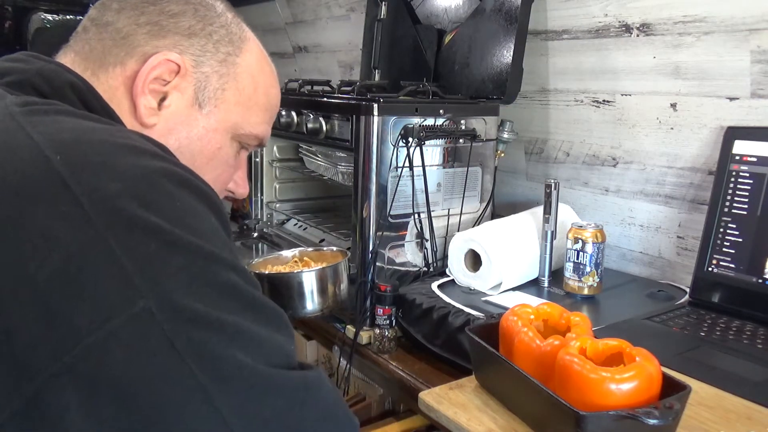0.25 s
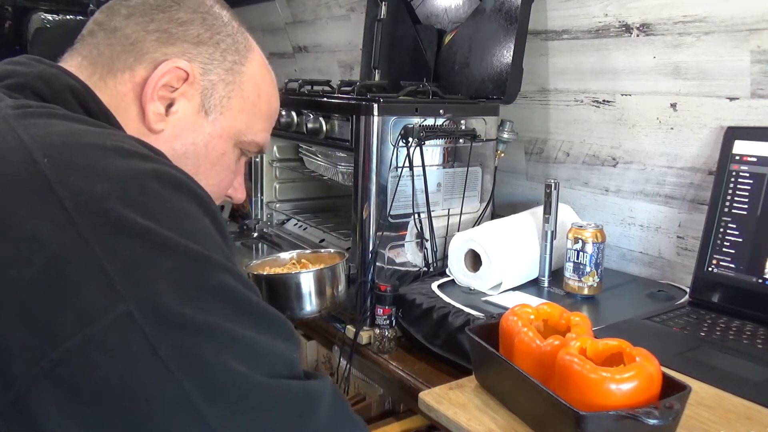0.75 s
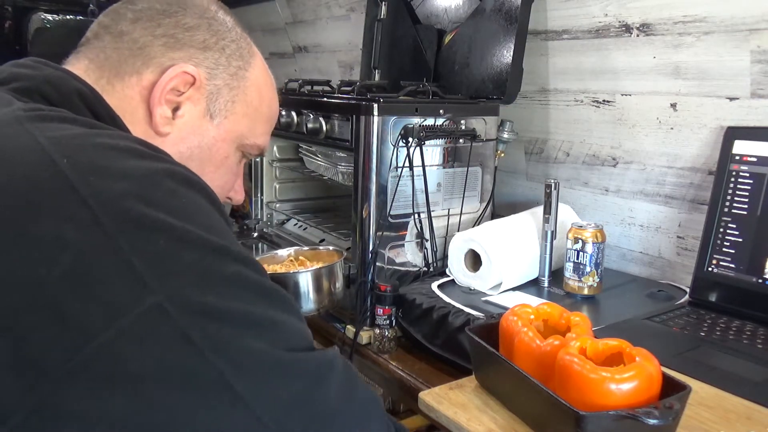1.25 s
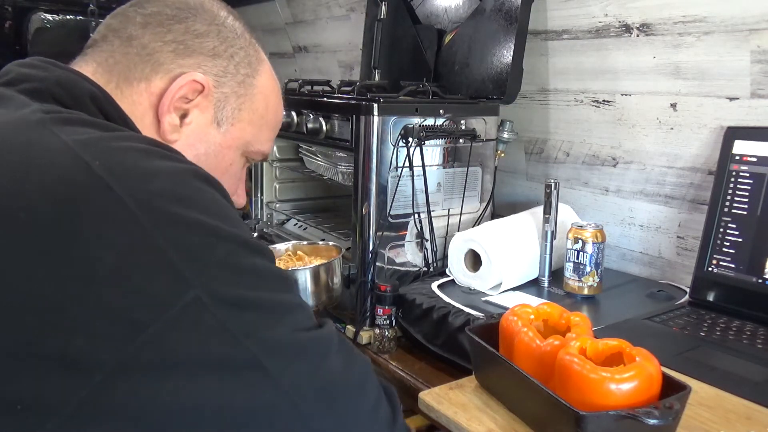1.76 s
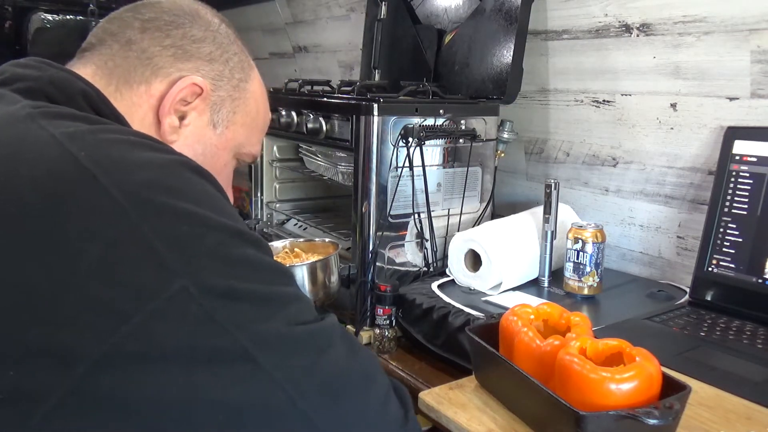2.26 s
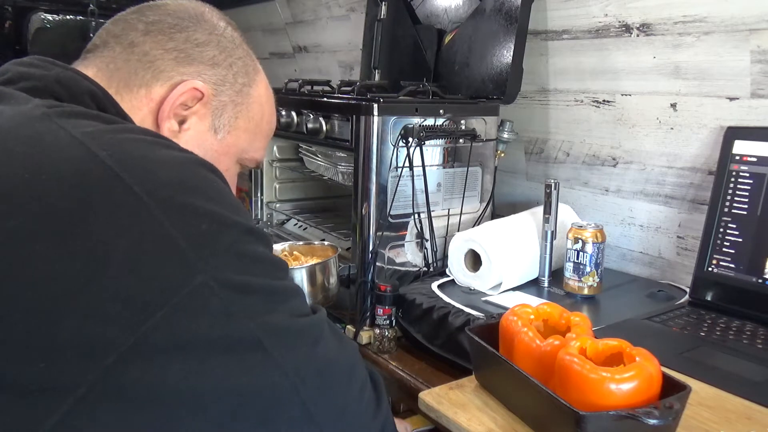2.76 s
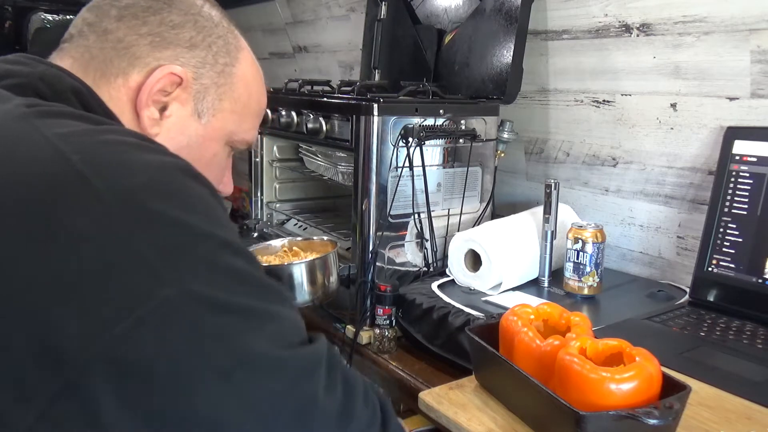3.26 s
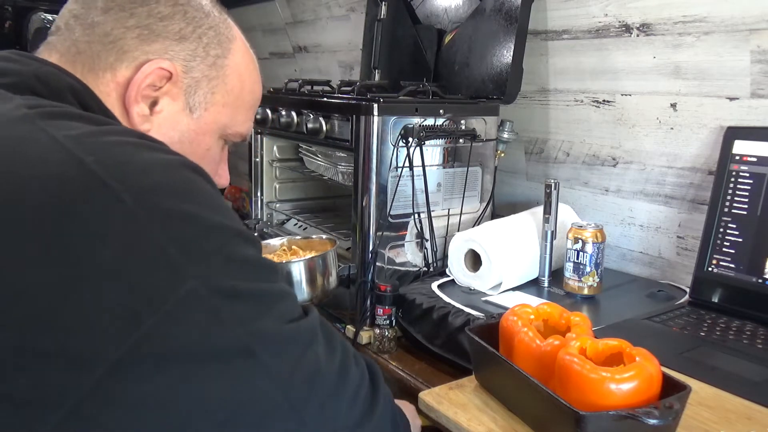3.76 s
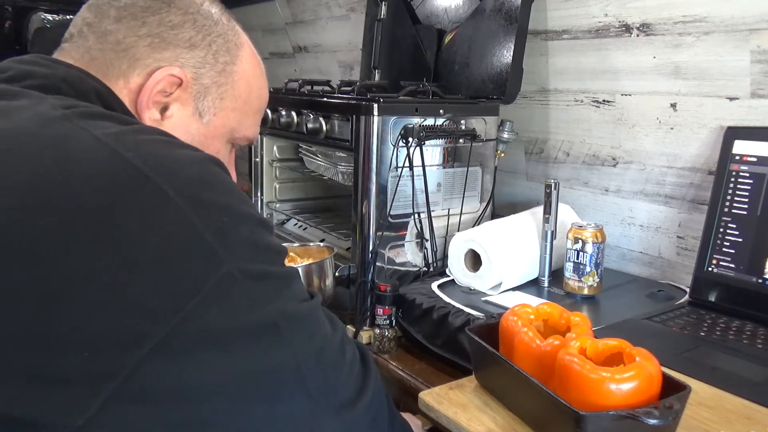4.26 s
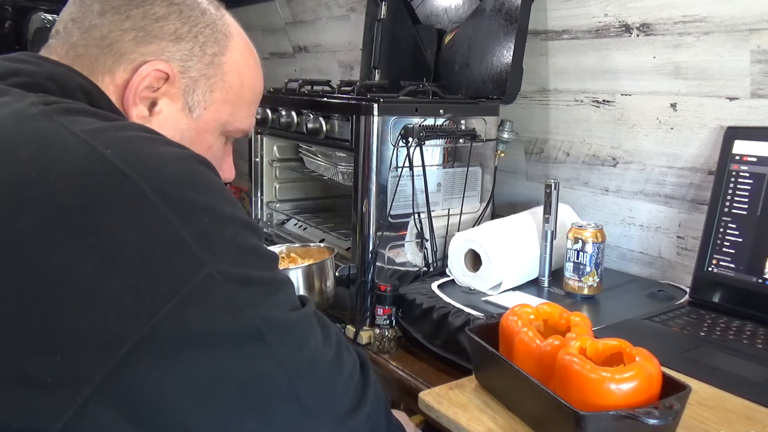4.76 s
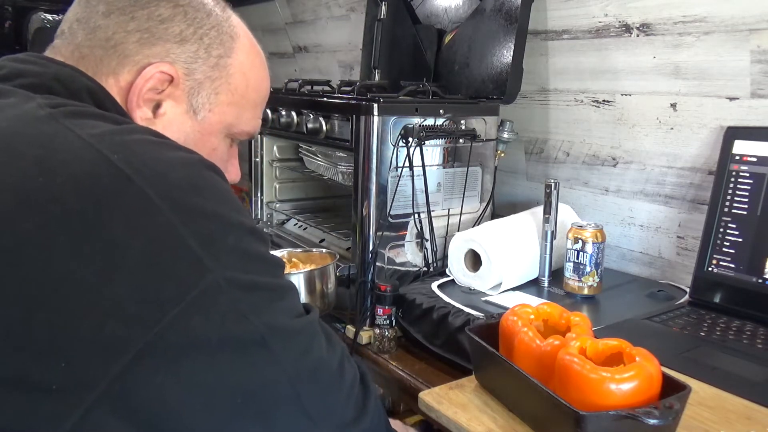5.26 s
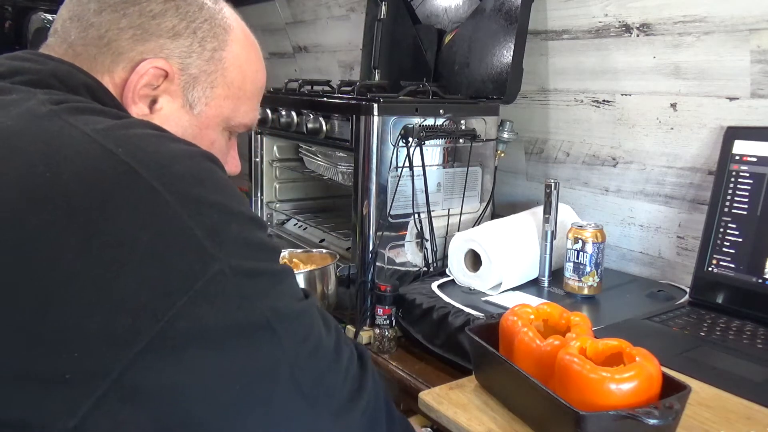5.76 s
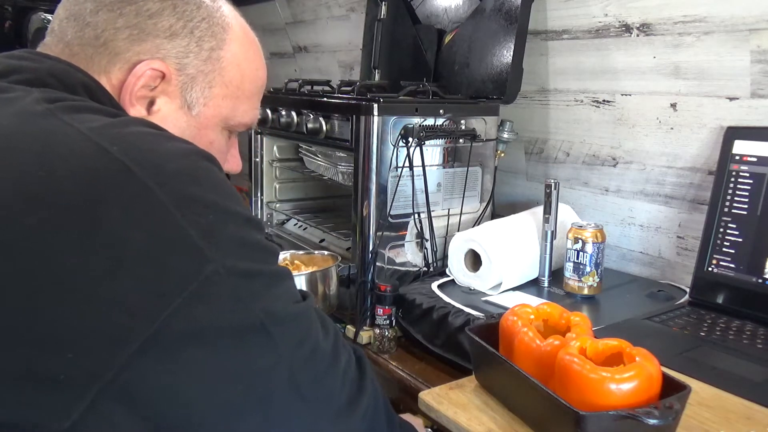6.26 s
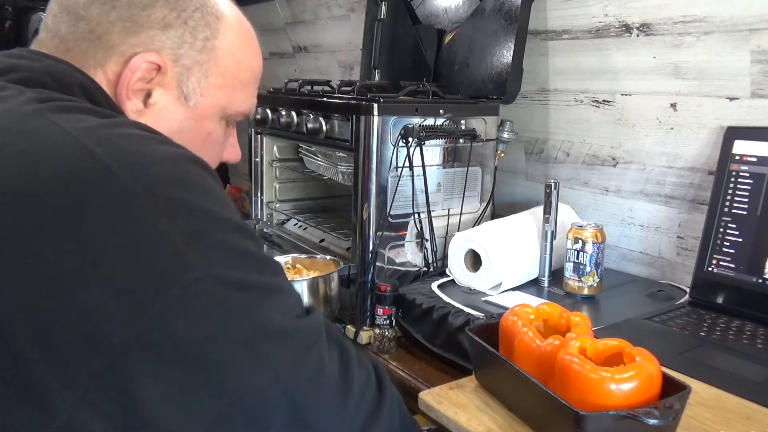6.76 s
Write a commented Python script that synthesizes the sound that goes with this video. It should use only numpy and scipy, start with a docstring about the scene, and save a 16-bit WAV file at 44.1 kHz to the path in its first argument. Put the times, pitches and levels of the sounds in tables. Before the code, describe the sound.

In a small kitchen, a hand searches through steel cutlery in a wooden drawer, heard close up with a short room tail over quiet hiss and faint appliance hum. From 0 s there are clinks, scuffs and a sliding rattle, with a strong hollow thud at about 0.25 s and a heavy clatter around 0.5-0.7 s. A thin, rough metal squeak mostly falls in pitch at 0.7-0.9 s. Until about 2.9 s contacts are sparser and duller, with woody knocks and a firmer clank near 1.9 s. Clinks gather again around 3 s with a knock, and clearer rings sound at 3.8-4.1 s. The brightest, densest jangling comes at 4.5-5.4 s, with sharp high ringing and a short slide near 5.3 s. A lull follows with only faint taps, then a quick bright flurry at 6.5-6.8 s dies into hiss.

```python
"""A hand rummages through steel cutlery in a wooden drawer, over a quiet appliance hum and hiss.
Clinks and a strong thud come first; a blade squeaks at 0.7-0.9 s, then contacts are sparser until 2.9 s.
They crowd together again, most brightly at 4.5-5.4 s; after a lull a last flurry ends near 6.8 s.
Contacts ring damped sines and shaped noise; knocks, scuffs and sliding drive resonances with noise and
ticks; the squeak is a roughened sine, and a short decaying noise tail is the small room."""
import sys
import numpy as np
from scipy import signal
from scipy.fft import rfft, irfft, next_fast_len
from scipy.io import wavfile
from scipy.ndimage import uniform_filter1d

SR = 44100
rng = np.random.default_rng(int(sys.argv[2]) if len(sys.argv) > 2 else 0)


def materialize(psi):
    """Save the field psi as 16-bit PCM at rate SR to the path in sys.argv[1].

    A 1-D psi becomes a single channel; in a 2-D psi each row is a channel.
    """
    bounded = np.clip(np.atleast_2d(psi).T, -1, 1)
    quanta = np.round(bounded * 32767).astype(np.int16)
    wavfile.write(sys.argv[1], SR, quanta)


N = 308455

# Modes of five pieces of cutlery. Each row: piece number, frequency in Hz, relative level in dB,
# nominal decay time t60 in seconds.
STEEL_MODES = [(0, 1303, -14, .4), (0, 1674, -9, .3), (0, 2239, -12, .5), (0, 3348, -15, .3),
               (0, 3967, -4, .22), (0, 4199, -4, .4), (0, 4565, -9, .35), (0, 5216, -12, .14),
               (1, 2820, -8, .2), (1, 5615, -3, .14), (1, 6608, -2, .12), (1, 8888, -2, .2),
               (1, 9565, -4, .1), (1, 11378, -8, .1), (1, 12545, -10, .12), (2, 4760, -8, .12),
               (2, 6772, -5, .13), (2, 8350, -4, .1), (2, 8730, -2, .1), (2, 9110, -5, .09),
               (2, 9720, -5, .11), (2, 10320, -3, .13), (2, 11008, -8, .13), (3, 7920, -8, .2),
               (3, 8048, -2, .28), (3, 10870, -12, .3), (4, 3700, -14, .15), (4, 10418, 0, .25),
               (4, 11650, -12, .15), (4, 14200, -18, .1)]
# Relative level in dB of each piece when only its neighbours are struck, one value per piece.
NUDGED_LEVELS = [-8.5, 2.5, 0.5, 6, -8.5]
# Spectrum of the clattering heap. Each row: frequency in Hz, relative density in dB per Hz.
CLATTER_SPECTRUM = [(1290, -17), (2200, -5), (4860, -3.5), (5290, -6.5), (5610, -4.5), (7410, -6.5),
                    (8620, -2.5), (10600, -12), (15800, -28), (16500, -40.5)]
# Modes of the drawer's bottom panel. Each row: frequency in Hz, width in Hz, level in dB.
PANEL_MODES = [(440.8, 59, 0.5), (574, 67, 3.5), (704, 121, 2), (767, 224, -8.5)]
# Modes of the drawer's divider walls. Each row: frequency in Hz, width in Hz, level in dB.
WALL_MODES = [(1086, 158, 4.5), (1394, 193, 4), (1774, 193, 3), (2437, 240, 0.5), (2740, 910, -6)]


def amp(db):
    """The decibel law: level in dB to amplitude ratio."""
    return 10 ** (np.asarray(db) / 20)


def unit(x):
    """Normalisation to an rms value of one."""
    return x / np.sqrt(np.mean(x ** 2) + 1e-20)


def along(points, hz):
    """Interpolation of (Hz, value) points on a logarithmic frequency axis."""
    f, v = np.transpose(points)
    return np.interp(np.log(hz + 1), np.log(f + 1), v)


def curves(rows):
    """Linear interpolation in time: one curve for each column after the time in seconds."""
    s, *cols = np.transpose(rows)
    t = np.arange(N) / SR
    return [np.interp(t, s, c, left=c[0], right=c[-1]) for c in cols]


def filtered(x, response):
    """Linear filtering: the spectrum of x times a complex response of frequency."""
    m = next_fast_len(N + SR // 2)
    return irfft(rfft(x, m) * response(np.fft.rfftfreq(m, 1 / SR)), m)[..., :N]


def resonances(modes):
    """Modal superposition: causal second-order response of (Hz, width in Hz, dB) modes, signs alternating."""
    def response(f):
        total = 0
        for k, (c, w, db) in enumerate(modes):
            total = total + (-1) ** k * amp(db) * 1j * f * w / (c * c - f * f + 1j * f * w)
        return total
    return response


def fade(t, db, hold, t60, rise):
    """Exponential decay: a contact rises fast, chatters at full strength for hold seconds, then dies."""
    decay_db = 60 * np.maximum(t - hold, 0) / np.clip(t60, .01, .4)
    return amp(db - decay_db) * (1 - np.exp(-t / rise))


def bursts(times, levels_db, t60s, hold, rise):
    """Energy addition: the envelope of a row of contacts, whose powers sum."""
    power, t = np.zeros(N + SR), np.arange(SR // 3) / SR
    for s, db, t60 in zip(times, levels_db, t60s):
        power[round(s * SR):][:len(t)] += fade(t, db, hold, t60, rise) ** 2
    return np.sqrt(power[:N])


def grit(per_second, spread_db, hiss):
    """Random impulse excitation: dense tiny contacts of uneven size on a bed of rubbing noise."""
    chance, size = rng.random((2, N))
    ticks = (chance < per_second / SR) * amp(-spread_db * size)
    return unit(unit(ticks * rng.standard_normal(N)) + hiss * rng.standard_normal(N))


def background():
    """Stationary noise and steady sines: microphone hiss and faint appliance tones."""
    # Hiss spectrum. Each row: frequency in Hz, relative density in dB per Hz.
    hiss_spectrum = [(15, -1), (30, 9.5), (60, 6), (120, -1.5), (233, 1), (322, -3), (636, -11),
                     (709, -8.5), (1010, -2), (1290, -14), (2160, -11), (2410, -14), (2620, -14),
                     (8900, -32), (15300, -19), (16600, -50)]
    # Appliance tones. Each row: frequency in Hz, rms level in dB.
    hum_tones = [(635, -68.5), (813, -71), (870, -67)]
    t = np.arange(N) / SR
    hiss = unit(filtered(rng.standard_normal(N), lambda f: amp(along(hiss_spectrum, f))))
    hum = sum(amp(db) * np.sqrt(2) * np.sin(2 * np.pi * hz * t) for hz, db in hum_tones)
    return amp(-58) * hiss + hum


def room(x):
    """Reverberation as convolution with decaying noise whose frequencies die at their own speed."""
    # Each row: frequency in Hz, decay time t60 in seconds.
    room_decay = [(300, 0.18), (2000, 0.12), (10000, 0.061)]
    hz, t, z = signal.stft(rng.standard_normal(SR // 3), SR, nperseg=256)
    decay = amp(-60 * t / along(room_decay, hz)[:, None])
    tail = signal.istft(z * decay, SR, nperseg=256)[1]
    return signal.fftconvolve(x, tail / np.linalg.norm(tail))[:N]


def squeak():
    """Noise modulation of a sine: a narrow, rough tone, mostly falling as a skidding blade slows."""
    # Each row: time in seconds, frequency in Hz, level in dB.
    skid = [(.68, 4680, -100), (.71, 4890, -32), (.80, 4490, -42), (.85, 4320, -35), (.885, 3930, -36),
            (.91, 3600, -100)]
    hz, db = curves(skid)
    smooth = uniform_filter1d(rng.standard_normal(N), size=90)
    rough = unit(uniform_filter1d(smooth, size=90))
    return amp(db) * rough * np.sin(2 * np.pi * np.cumsum(hz) / SR)


def slide():
    """Friction excitation: rubbing grit feeds the steel modes, a broad rustle and the wood."""
    # Each row: time in seconds, level of the steel rattle in dB, level of the drawer rumble in dB.
    sliding = [(0.0, -41.5, -36), (0.54, -43.5, -38), (0.72, -34.5, -47), (0.95, -53, -52),
               (3.15, -61, -57.5), (3.74, -63, -60), (3.93, -54, -46.5), (4.19, -54.5, -59.5),
               (4.54, -56, -49.5), (4.79, -59, -55), (4.98, -51, -61), (5.32, -41, -48.5),
               (5.49, -58.5, -55), (6.41, -63.5, -61), (6.58, -52, -49), (6.99, -61.5, -64)]
    steel_db, wood_db = curves(sliding)
    narrow = [(hz, 10.0 / t60, db) for _, hz, db, t60 in STEEL_MODES]
    chime = unit(filtered(grit(326, spread_db=19, hiss=0.33), resonances(narrow)))
    rustle = filtered(grit(2000, spread_db=14, hiss=4.0), lambda f: amp(along(CLATTER_SPECTRUM, f)))
    rub = grit(600, spread_db=2, hiss=0.58)
    panel = unit(filtered(rub, resonances(PANEL_MODES)))
    walls = unit(filtered(rub, resonances(WALL_MODES)))
    steel = unit(0.5 * chime + unit(rustle))
    return amp(steel_db) * steel + amp(wood_db) * unit(panel + 0.9 * walls)


def small_panel(hz):
    """Inefficient radiation below 380 Hz: a small panel sends out little bass (second-order high-pass)."""
    ratio = 1j * hz / 380
    return ratio ** 2 / (1 + ratio + ratio ** 2)


def knocks():
    """Forced modal vibration: knocks and scuffs shake the drawer's bottom panel and walls, jolts its frame."""
    # Knocks and scuffs of steel on the drawer wood; rows with long decay are drags. Each row: start in
    # seconds, relative level of the panel's part in dB, relative level of the walls' part in dB,
    # nominal decay time t60 in seconds.
    wood_contacts = [(.002, -24, -29.5, 0.044), (.032, -22, -41, 0.1), (0.241, -2.5, -15.5, 0.026),
                     (.269, -31, -21.5, 0.13), (.326, -19.5, -32, 0.022), (0.418, -16.5, -18.5, 0.039),
                     (0.5, -37, -25, 0.1), (0.524, -29, -26, 0.34), (.563, -25, -19, 0.28),
                     (0.667, -18.5, -24.5, 0.078), (.747, -32, -31.5, 0.071), (0.905, -17.5, -23, 0.041),
                     (0.932, -26.5, -33.5, 0.05), (1.101, -32, -27.5, 0.18), (1.128, -19, -21, .095),
                     (1.164, -34, -28, 0.18), (1.422, -23.5, -25.5, 0.16), (1.45, -19.5, -25.5, 0.054),
                     (1.53, -23.5, -34.5, 0.053), (1.616, -22.5, -26, .16), (1.887, -33.5, -29, 0.15),
                     (1.934, -20.5, -24, 0.19), (2.021, -31.5, -30.5, 0.26), (2.13, -30, -41, .03),
                     (2.589, -48, -34, 0.053), (3.022, -15, -17, 0.05), (3.04, -21.5, -22, 0.1),
                     (3.068, -28, -43, .09), (3.844, -22, -21, 0.1), (3.871, -25.5, -40, 0.076),
                     (4.104, -22, -15, 0.043), (4.142, -27.5, -29, .1), (4.345, -26.5, -37, 0.044),
                     (4.574, -21.5, -36, 0.03), (4.599, -24, -41, 0.028), (4.631, -39, -31.5, 0.06),
                     (4.649, -30.5, -31, 0.09), (4.678, -29.5, -26, .18), (4.831, -21.5, -26, 0.11),
                     (4.881, -30.5, -30, 0.28), (4.953, -23, -24, 0.048), (5.014, -34.5, -30.5, 0.064),
                     (5.154, -38.5, -27, 0.012), (5.197, -38, -31, 0.096), (5.321, -28.5, -27, 0.15),
                     (5.431, -26, -29, 0.068), (5.87, -35.5, -41, 0.055), (5.949, -49.5, -48, .04),
                     (6.409, -39.5, -59, 0.087), (6.571, -41, -40.5, 0.38), (6.735, -43, -41.5, 0.15)]
    # Jolts of the frame. Each row: start in seconds, relative level of the drive in dB.
    jolts = [(.088, -31.5), (.237, -33.5), (.517, -47), (1.119, -36.5), (1.423, -33), (1.934, -33),
             (6.721, -35.5), (6.751, -43.5)]
    s, panel_db, walls_db, t60 = np.transpose(wood_contacts)
    jolt_s, jolt_db = np.transpose(jolts)

    panel_drive = bursts(s, panel_db + 13.5, 1.28 * t60, hold=0.0015, rise=0.00021)
    panel = filtered(grit(1500, spread_db=22.5, hiss=0.9) * panel_drive, resonances(PANEL_MODES))

    walls_drive = bursts(s, walls_db + 7.5, 1.173 * t60, hold=0.0086, rise=0.00017)
    walls = filtered(grit(1500, spread_db=1, hiss=1.26) * walls_drive, resonances(WALL_MODES))

    jolt_drive = bursts(jolt_s, jolt_db, np.full(len(jolts), 0.2), hold=0.006, rise=0.00033)
    frame = filtered(rng.standard_normal(N) * jolt_drive, resonances([(295, 52, 18.7)]))
    return filtered(panel, small_panel) + walls + frame


def steel_ring(t, ring_hz, t60, hold, until):
    """Free modal vibration: struck pieces ring strongest, and the next contact grips the steel modes."""
    piece, hz, level_db, ring_t60 = np.transpose(STEEL_MODES)[:, :, None]
    nudged_db = np.take(NUDGED_LEVELS, piece.astype(int))
    level_scatter, phase = rng.standard_normal((2, len(STEEL_MODES), 1))
    match = np.exp(-(np.log(hz / ring_hz) / .012) ** 2)
    struck = ((piece == piece.T) * match.T).max(1, keepdims=True)  # all modes of a struck piece sound
    # neighbours damp what lies buried
    life = np.clip(t60 / 0.11, .3, 1.5) * ring_t60 * (0.38 + 0.5 * struck)
    start_db = level_db + 7.3 * struck + nudged_db * (1 - struck) + 4.5 * match + 4.3 * level_scatter
    after = np.maximum(t - hold, 0)
    grip_db = -600 * np.maximum(t - until, 0)
    gain = amp(start_db - 60 * after / life + grip_db)
    modes = (gain * np.sin(2 * np.pi * hz * t + phase)).sum(0) * (1 - np.exp(-t / 0.00044))
    # the tone loudest at this contact, brief while the piece is pinned
    own = amp(7.0 - 60 * after / (1.05 * t60)) * np.sin(2 * np.pi * ring_hz * t)
    return modes + own * (1 - np.exp(-t / .001))


def heap_clatter(t, f, jangle, ring_hz, tilt_db, ring_db):
    """High modal density: many brief modes heard as noise with a jumble of narrow spectral peaks."""
    noise, peaks, bumps = rng.standard_normal((3, len(t)))
    modes_db = 4.63 * unit(uniform_filter1d(peaks[:len(f)], size=7))
    near_db = 5 * np.exp(-(np.log((f + 1) / ring_hz) / 0.079) ** 2)
    colour = amp(modes_db + near_db) + amp(ring_db + 0.5) * jangle
    colour = colour * amp(along(CLATTER_SPECTRUM, f) + tilt_db)
    heap = unit(irfft(rfft(noise) * colour, len(t)))
    # first crack, then bounces
    bounce_db = 3.16 * unit(uniform_filter1d(bumps, size=110)) + 7.6 * np.exp(-t / 0.0009)
    return heap * amp(bounce_db)


def tinkle(t, f, tilt_db, t60, hold):
    """Random modal texture: twelve damped sines, pitches drawn anew for each contact, tinkle sparsely."""
    # Lowest and highest pitch in Hz.
    ping_range = (3000, 14000)
    pitch, softness, delay = rng.random((3, 12, 1))
    hz = ping_range[0] + (ping_range[1] - ping_range[0]) * pitch
    age = np.maximum(t - 3 * hold * delay, 0)
    db = along(CLATTER_SPECTRUM, hz) + np.interp(hz, f, tilt_db - tilt_db.max()) - 20 * softness
    return (amp(db - 60 * age / (.75 * t60)) * np.sin(2 * np.pi * hz * age)).sum(0)


def clinks():
    """Impact excitation: each steel contact sums ringing pieces, a clattering heap and a metallic tinkle."""
    # Steel on steel. Each row: start in seconds, relative level in dB, loudest ring in Hz,
    # nominal decay time t60 in seconds, relative brightness in dB.
    contacts = [(.0014, -7, 7140, 0.06, -14.5), (.037, -15.5, 9040, 0.12, -11),
                (0.07, -18.5, 4950, 0.18, -20), (0.167, -20.5, 3360, 0.045, -11),
                (.215, -11, 8060, 0.058, -5), (0.2428, -14, 7800, 0.086, -32),
                (.266, -11.5, 4900, 0.057, -24), (.29, -14.5, 4400, 0.089, -16),
                (0.3218, -11, 8830, 0.057, -27), (0.4172, -12, 5770, 0.035, -28),
                (0.467, -20, 4190, 0.21, -11), (.51, -3.5, 8140, 0.18, -34), (0.5287, -8, 4490, 0.12, -30),
                (.5736, -6.5, 8530, 0.11, -6), (0.594, -15.5, 3800, 0.37, -49),
                (0.6639, -6.5, 3110, 0.057, -29), (.7416, -16, 4570, 0.35, -20),
                (0.898, -36, 4300, 0.18, -39), (.954, -16.5, 7900, 0.066, -12),
                (1.093, -12.5, 5620, .12, -44), (1.1208, -7.5, 2720, 0.2, -29.5),
                (1.2104, -16.5, 2460, 0.089, -44), (1.422, -17.5, 3170, 0.15, -22),
                (1.4496, -9, 2480, 0.096, -34), (1.529, -23.5, 5600, 0.068, -41),
                (1.6165, -22, 2490, 0.22, -32), (1.8482, -23.5, 6600, 0.11, -8),
                (1.8793, -16, 2580, .12, -30), (1.911, -19, 2450, 0.083, -23),
                (1.931, -4.5, 2840, 0.19, -22.5), (2.0147, -8.5, 5600, 0.15, -29),
                (2.127, -21, 7540, .091, -18), (2.3087, -26, 3480, 0.18, -65),
                (2.3394, -17.5, 8360, 0.064, 7), (2.432, -29.5, 2580, 0.21, -19),
                (2.466, -24.5, 4560, 0.15, -16.5), (2.518, -30, 5800, .06, -18),
                (2.54, -31, 9570, 0.055, -16), (2.563, -28, 3280, 0.28, -20.5),
                (2.589, -11, 3730, 0.086, -43), (2.598, -19.5, 3870, .05, -38.5),
                (2.6697, -15.5, 8130, .08, -4), (2.718, -29, 4570, 0.075, -13),
                (2.879, -20.5, 8200, 0.19, -2.5), (2.914, -16.5, 4760, 0.14, -4),
                (2.953, -8.5, 9570, 0.07, -1), (2.9747, -21, 6300, 0.12, -24),
                (3.0224, -9, 8750, 0.12, -11), (3.1078, -16.5, 6608, .14, -7),
                (3.1605, -21, 3220, 0.14, -43), (3.1825, -19.5, 7900, 0.09, -16),
                (3.4524, -34, 2540, 0.048, -22), (3.479, -18.5, 8050, 0.12, 7),
                (3.5476, -30.5, 3970, .11, -30), (3.569, -17.5, 4560, .04, -62),
                (3.7102, -12.5, 3220, 0.04, -67), (3.7406, -25.5, 8060, 0.17, -17),
                (3.7883, -7, 9100, 0.12, -3.5), (3.848, -7.5, 3970, 0.18, -26.5),
                (3.9698, -5.5, 8730, 0.13, -4.5), (4.0312, -22, 9400, 0.11, -22),
                (4.077, -34, 5030, 0.067, -3), (4.1046, -17.5, 4850, 0.16, -6),
                (4.3323, -12, 6600, .067, -6), (4.5017, -28.5, 5220, 0.1, -12),
                (4.531, -17, 6060, 0.061, -18), (4.5645, -17.5, 5960, 0.11, 1), (4.5758, -5, 6590, 0.24, 1),
                (4.6174, -4.5, 8040, 0.15, 7), (4.6362, -7.5, 5550, 0.17, -5), (4.67, -9.5, 6780, 0.31, 7),
                (4.7006, -7.5, 10420, 0.16, -0.5), (4.718, -7.5, 5630, .15, -8), (4.741, -5, 6580, .09, 9),
                (4.8344, -25.5, 10430, 0.031, -24), (4.8544, -6, 10400, 0.082, -13),
                (4.9471, -8, 8880, 0.079, -13), (4.9803, -3, 10400, .12, 3.5),
                (5.155, -4.5, 8730, 0.2, -11.5), (5.198, -6, 8910, 0.11, -3.5),
                (5.2345, -6.5, 8720, 0.091, -9), (5.3057, -15.5, 5600, 0.46, 1),
                (5.332, -13.5, 12520, 0.14, -17), (5.3957, -4, 6600, 0.13, 5),
                (5.4278, -10, 6760, 0.095, -13), (5.553, -42.5, 6300, 0.091, -18),
                (5.802, -26, 2800, 0.068, -32), (5.872, -18, 3080, 0.085, -19),
                (6.074, -31, 3420, 0.048, -11), (6.4287, -29, 9650, 0.14, -2),
                (6.482, -32.5, 3700, 0.1, -39), (6.5138, -10.5, 6200, 0.069, 3),
                (6.569, -16, 3060, 0.055, -81), (6.585, -22.5, 6620, 0.1, -16),
                (6.6283, -14.5, 6600, 0.16, 0), (6.6465, -8.5, 8350, 0.13, 0.5),
                (6.674, -4.5, 6610, 0.11, -2), (6.7064, -6, 5610, 0.083, -0.5),
                (6.801, -26, 10000, 0.025, 11)]
    # How freely the pieces ring over the clatter. Each row: time in seconds, relative level in dB.
    looseness = [(0, -10), (.6, -3.5), (1.2, -15), (2.2, -10), (2.7, -7.5), (3.0, -10), (3.5, -1.5),
                 (3.75, -7), (3.85, 1), (4.1, -3.5), (4.5, -6.5), (4.7, 0), (4.9, 0), (5.2, -2),
                 (5.45, -4.5), (5.9, -16), (6.5, -4.5), (6.7, -6.5)]
    out, t = np.zeros(N + SR), np.arange(next_fast_len(SR // 4)) / SR
    f = np.fft.rfftfreq(len(t), 1 / SR)
    # chatter keeps feeding the steel modes, here 35 Hz wide
    fed = [(hz, 35, db + NUDGED_LEVELS[k]) for k, hz, db, _ in STEEL_MODES]
    jangle = np.abs(resonances(fed)(f))
    free = np.diff([row[0] for row in contacts], append=N / SR)  # seconds until the next contact
    for (s, db, ring_hz, t60, bright_db), until in zip(contacts, free):
        hold = 0.073 * t60  # the contact chatters at full strength for this long
        ring_db = np.interp(s, *np.transpose(looseness))
        # hard contacts are bright and thin
        tilt_db = (bright_db + 20.5) * (1 / (1 + (7000 / (f + 1)) ** 3) - .3)
        ring = steel_ring(t, ring_hz, t60, hold, until)
        heap = heap_clatter(t, f, jangle, ring_hz, tilt_db, ring_db)
        pings = tinkle(t, f, tilt_db, t60, hold)
        # the heap's clatter dies sooner than the loudest tone
        heap = heap * fade(t, db - 15, hold, 0.82 * t60, rise=0.00085)
        contact = amp(db + ring_db - 26.5) * ring + amp(db + ring_db - 1) * pings + heap
        out[round(s * SR):][:len(t)] += contact
    return out[:N]


def scene():
    """Superposition of sources and room; a decorrelated side signal of opposite sign widens the stereo."""
    # Room sound that differs left to right. Each row: frequency in Hz, filter gain in dB.
    side_gain = [(60, -28), (150, -28), (380, -28), (950, -14.5), (2380, -15), (5980, -16), (15000, -27)]
    drawer = clinks() + knocks() + slide() + squeak()
    centre = drawer + amp(-17.5) * room(drawer) + background()
    side = filtered(room(centre), lambda f: amp(along(side_gain, f)))
    return np.array([centre + side, centre - side])


def record(dry):
    """Saturation and band limiting: peaks round off softly, deep bass drops, the top is cut off."""
    low_cut_hz, top_hz = 117, 15900
    soft = dry / (1 + np.abs(dry / .6) ** 4) ** (1 / 4)
    return filtered(soft, lambda hz: (hz < top_hz) * (1j * hz / (low_cut_hz + 1j * hz)) ** 2)


dry = scene()
out = record(dry)
materialize(out)
```